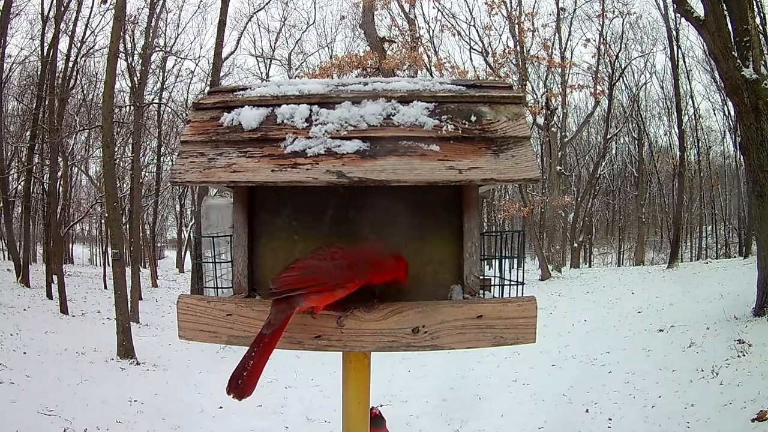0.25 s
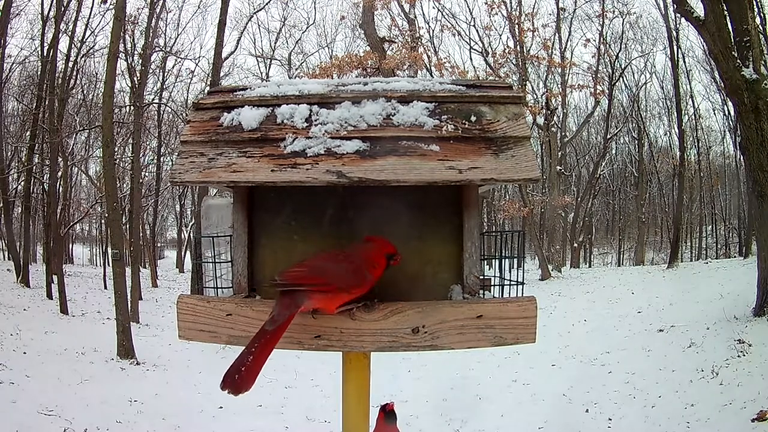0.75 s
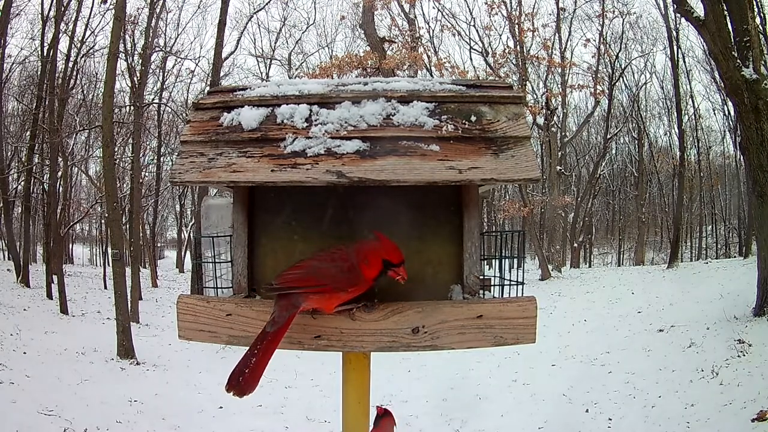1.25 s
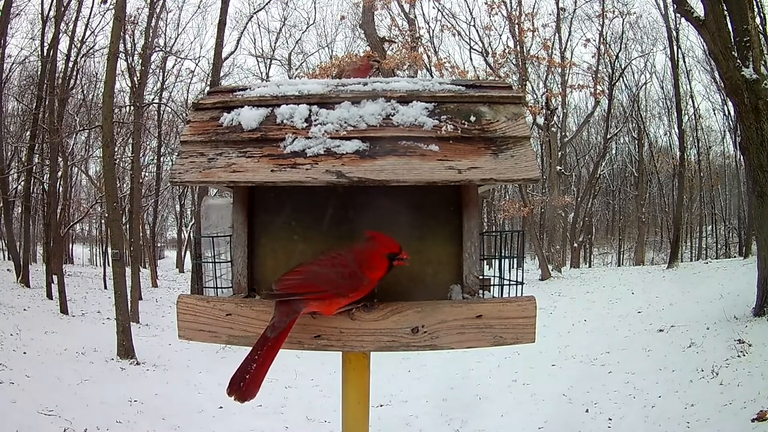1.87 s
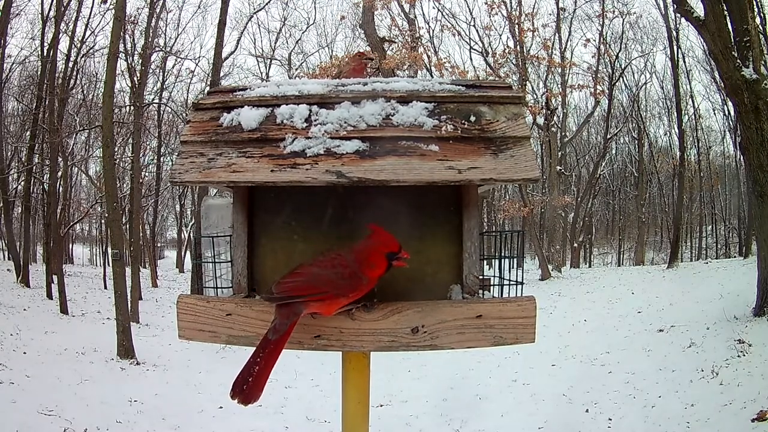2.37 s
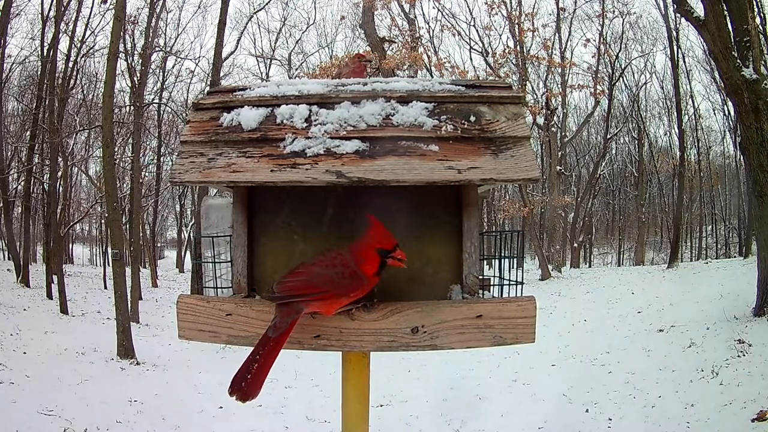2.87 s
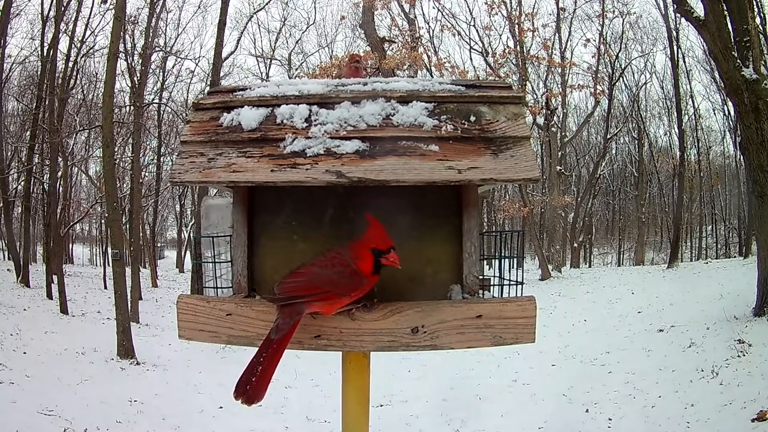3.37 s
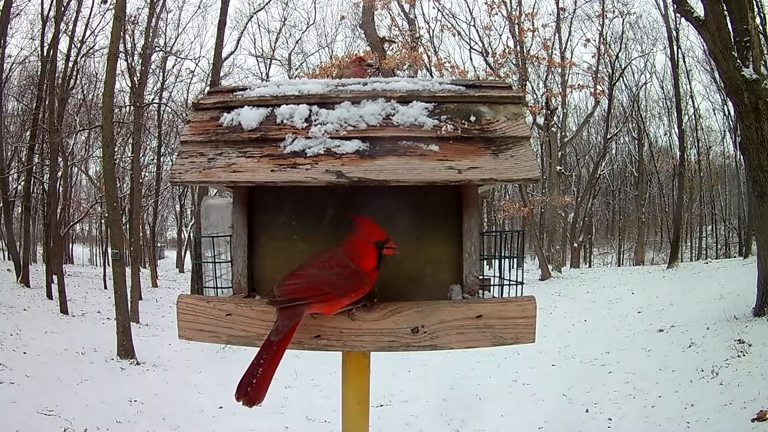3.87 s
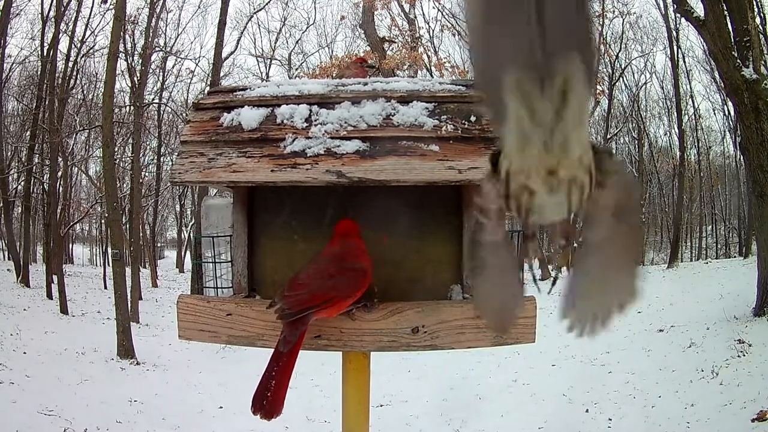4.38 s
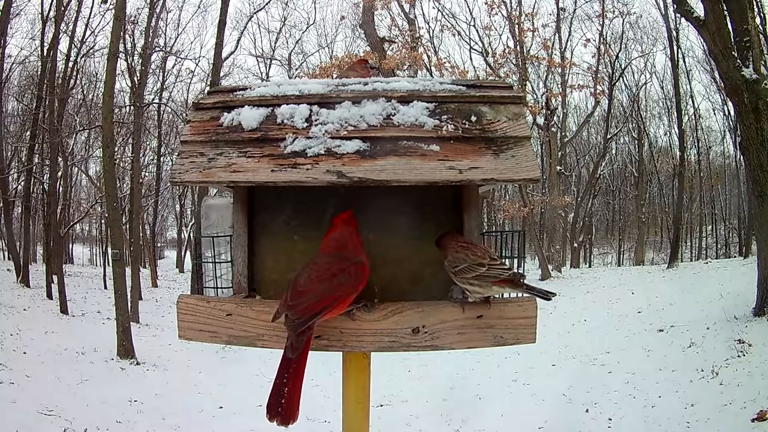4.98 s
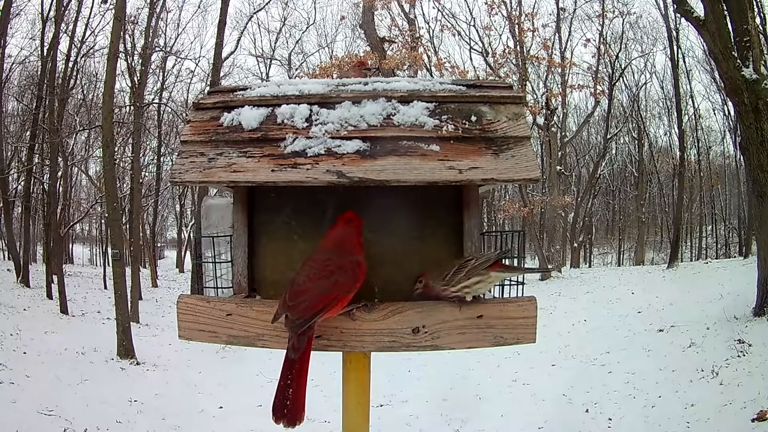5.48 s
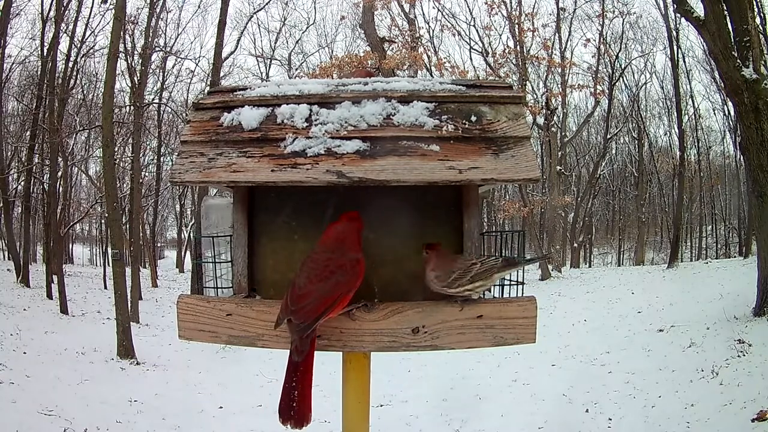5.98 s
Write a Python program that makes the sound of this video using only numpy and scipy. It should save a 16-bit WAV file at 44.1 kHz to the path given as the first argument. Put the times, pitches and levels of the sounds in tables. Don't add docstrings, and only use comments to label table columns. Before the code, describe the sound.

Very close on a wooden bird feeder in a quiet snowy wood, a fast cluster of sharp bill knocks and dry seed rummaging opens, thinning to single taps. Near silence follows with faint hiss, low trembling and tiny husk cracks. One small knock comes midway, then a short clatter of claws and a soft hollow thump.

```python
import sys
import numpy as np
from scipy import signal
from scipy.io import wavfile
from scipy.ndimage import uniform_filter1d

SR = 44100
rng = np.random.default_rng(int(sys.argv[2]) if len(sys.argv) > 2 else 0)


def rack_gain(trim_db):
    fader = np.asarray(trim_db, float)
    return 10 ** (fader / 20)


def log_audio(samples):
    frames = np.atleast_2d(samples).T
    limited = np.clip(frames, -1, 1)
    pcm = np.round(limited * 32767).astype(np.int16)
    wavfile.write(sys.argv[1], SR, pcm)


N = 275180


def rms_one(x):
    return x / np.sqrt(np.mean(x ** 2) + 1e-20)


def along(rows):
    time_s, level_db = np.transpose(rows)
    return rack_gain(np.interp(np.arange(N) / SR, time_s, level_db))


def bandpass(x, order, low_hz, high_hz):
    return signal.sosfilt(signal.butter(order, [low_hz, high_hz], "band", fs=SR, output="sos"), x)


def ring(force, modes, sign=-1):
    out = 0
    for k, (hz, db, t60) in enumerate(modes):
        radius = rack_gain(-60 / (t60 * SR))
        w = 2 * np.pi * hz / SR
        poles = [1, -2 * radius * np.cos(w), radius * radius]
        out = out + sign ** k * rack_gain(db) * signal.lfilter([0, np.sin(w)], poles, force + 1e-18)
    return out


# start_s, place, then peaks board_db, middle_db, bright_db
HARD_KNOCKS = [(0.0191, "rim", -13.5, -26, -15), (0.0276, "corner", -19, -48.5, -38),
               (0.0825, "floor", -26, -54.5, -25.5), (0.1316, "post", -24.5, -54.5, -40),
               (0.171, "floor", -11.5, -26, -8), (0.1772, "floor", -33, -40, -17),
               (0.1899, "rim", -14.5, -9, -16), (0.222, "corner", -25.5, -27, -25.5),
               (0.229, "corner", -14, -27, -15.5), (0.5705, "rim", -31.5, -39, -38.5),
               (0.658, "rim", -13.5, -19, -24), (3.3339, "corner", -14.5, -23, -19.5),
               (4.0351, "edge", -26, -38, -32), (4.0714, "post", -12, -16.5, -14),
               (4.2762, "edge", -17, -34.5, -26), (4.299, "perch", -21, -19.5, -17)]
TRAY_PLACES = {"rim": (1390, 2210, 3880, 5100.5, -30), "floor": (1150, 2230, 4030.5, 4900, -29.5),
               "corner": (1439.5, 2490, 3600, 5090, -27), "post": (1410, 2214.5, 3559, 5199.5, -27.5),
               "perch": (1646, 1967, 3679.5, 5199, -13.5), "edge": (1171, 1910, 3399, 5099.5, -41.5)}
# start_s, pitch_hz (board), then peaks board_db, bright_db
LIGHT_TICKS = [(0.046, 1450, -46, -27), (0.2807, 1069, -40, -48.5), (0.29, 877.3, -44.5, -50.5),
               (0.2986, 1222, -53.5, -54), (0.318, 1450, -40.5, -46.5), (0.3234, 1384, -44, -44.5),
               (0.4154, 1535, -30.5, -42), (0.423, 1495, -35.5, -54.5), (0.4641, 1228, -50, -45),
               (0.4701, 1248, -39.5, -47.5), (0.63, 1527, -45.5, -39), (1.3102, 1420, -57, -69.5),
               (2.1248, 1904, -46.5, -69.5), (2.2407, 1371, -49, -61), (2.874, 902.1, -51.5, -73),
               (2.8876, 1040, -47, -62.5), (2.9194, 1360, -53.5, -65.5), (3.2669, 902, -63.5, -55.5),
               (3.3028, 1225, -52.5, -44.5), (3.3055, 1171, -34.5, -48), (4.125, 1259, -52, -67),
               (4.157, 1259, -49.5, -67.5), (4.1655, 1087, -41, -58.5), (4.1895, 1450, -44, -56),
               (4.239, 1334, -40.5, -47.5), (4.2463, 1248, -54.5, -59), (4.2609, 1070, -40.5, -51.5),
               (4.3162, 1440, -30.5, -43), (5.6801, 1603, -58, -81.5)]
# start_s, pitch_hz (snap), then peaks board_db, bright_db, snap_db
HUSK_CRACKS = [
    (1.6694, 5130, -44.5, -40, -50.5),
    (2.4971, 4100, -69.5, -58.5, -64),
    (2.5743, 7031, -75.5, -59, -60.5),
    (2.5756, 10230, -74.5, -68.5, -64.5),
    (4.0599, 4910, -53.5, -24.5, -40.5),
    (4.2201, 6340, -55, -51, -62),
]
BOARD_HZ, MIDDLE_HZ, BRIGHT_HZ, TOP_HZ = 1390, 2239.9, 3784.2, 5050


def tap_rows():
    middle_under_board_db, top_under_bright_db = -12.5, -21
    rows = []
    for s, place, low, mid, high in HARD_KNOCKS:
        *rings_hz, top_db = TRAY_PLACES[place]
        rows.append((s, 0, *rings_hz, low, mid, high, high + top_db))
    for s, hz, low, high in LIGHT_TICKS:
        rows.append((s, 1, hz, MIDDLE_HZ, BRIGHT_HZ, TOP_HZ,
                     low, low + middle_under_board_db, high, high + top_under_bright_db))
    for s, hz, low, high, snap in HUSK_CRACKS:
        rows.append((s, 1, BOARD_HZ, MIDDLE_HZ, BRIGHT_HZ, hz,
                     low, low + middle_under_board_db, high, snap))
    return rows


def taps(rise_s=.0016, board_t60=0.0082, middle_t60=0.013, bright_t60=0.009, top_t60=.009):
    husk_hz = 6400
    spread = np.array([.08, 0.12, .03])
    light_ring_share = 0.77
    snap_db, snap_t60 = -12, .005
    rows = tap_rows()
    t = np.arange(2000) / SR
    out = np.zeros(N + len(t))
    chance = rng.random((len(rows), 6))
    snaps = rms_one(bandpass(rng.standard_normal((len(rows), len(t))), 7, 488.3, 3959))
    swell = np.sin(np.pi / 2 * np.minimum(t / rise_s, 1)) ** 2
    for row, c, snap in zip(rows, chance, snaps):
        s, light, hz, mid_hz, high_hz, top_hz, low_db, mid_db, high_db, top_db = row
        shift = 1 + light * (2 * c[3:] - 1) * spread
        mid_hz, high_hz, top_hz = shift * [mid_hz, high_hz, top_hz]
        tones = [(hz, low_db + .5, board_t60),
                 (hz * .72, low_db - 9.5, board_t60),
                 (mid_hz, mid_db + .5, middle_t60),
                 (high_hz, high_db - 2.0, bright_t60),
                 (2 * BRIGHT_HZ - high_hz + 250, high_db - 12.0, bright_t60),
                 (top_hz, top_db + 1.5, top_t60),
                 (husk_hz * (.92 + .1 * c[0]), top_db - 11.0, top_t60),
                 (husk_hz * (1.05 + 0.17 * c[1]), top_db - 13, top_t60),
                 (husk_hz * (1.45 + .25 * c[2]), top_db - 20.5, top_t60)]
        after = np.maximum(t - rise_s, 0) / light_ring_share ** light
        body = sum(rack_gain(d - 60 * after / t60) * np.sin(2 * np.pi * f * t) for f, d, t60 in tones)
        body = body + rack_gain((low_db + high_db) / 2 + snap_db - 60 * after / snap_t60) * snap
        i = round((s + 0.00066 - rise_s) * SR)
        out[i:i + len(t)] += swell * body
    return out[:N]


# start_s, length_s, board_db, shell_db
SCRAPE_BURSTS = [(0, 0.016, -44, -51), (0.02, 0.022, -36, -40.5), (0.046, 0.03113, -39, -44.5),
                 (0.074, 0.026853, -39.5, -49.5), (0.102, 0.02194, -53, -59.5), (0.129, 0.023413, -35.5, -41),
                 (0.153, 0.005906, -40.5, -49), (0.166, 0.027633, -29.5, -36), (0.195, 0.00236, -25.5, -35.5),
                 (0.201, 0.02257, -34.5, -40), (0.232, 0.024303, -52, -56), (0.263, 0.012447, -39.5, -49),
                 (0.375, 0.01562, -61.5, -63), (0.388, 0.010794, -37.5, -45.5), (0.414, 0.012987, -47, -72.5),
                 (0.438, 0.014732, -39.5, -47.5), (0.461, 0.031, -55.5, -65.5), (0.478, 0.0305, -41, -50.5),
                 (0.516, 0.010849, -40, -53), (0.527, 0.034075, -44.5, -56), (0.566, 0.007497, -40, -55.5),
                 (0.586, 0.00649, -42, -57), (0.6, 0.0153, -57, -64), (0.619, 0.049126, -45, -52),
                 (1.72, 0.05, -68, -84), (3.279, 0.00646, -55, -66), (3.287, .004, -53.5, -64),
                (3.298, 0.014204, -49, -58.5), (3.318, 0.015, -48.5, -45.5), (3.349, 0.02196, -62.5, -76.5),
                (4.004, 0.031, -66, -70.5), (4.036, 0.04741, -44.5, -47), (4.091, 0.018296, -58.5, -66.5),
                (4.122, 0.01467, -62, -78), (4.152, 0.0089, -51, -67), (4.166, 0.0096, -54.5, -71),
                (4.216, 0.016, -54, -69), (4.239, 0.035928, -48, -63.5), (4.274, 0.017995, -42.5, -41.5),
                (4.297, 0.025164, -44, -46.5)]
# pitch_hz, level_db, t60_s
BOARD_MODES = [(501, -4, 0.0037), (780, -3.5, .015), (1120, -4, 0.016), (1450, 1, .012), (1950, -6, 0.018),
               (2250, -3.5, 0.0095), (2800, -17, .008)]
SHELL_MODES = [(3320.9, -1, .012), (3850, 0, 0.013), (4200, -1.5, .012), (4925, -10.5, .008)]
HUSK_MODES = [(5200, 1, .008), (5900, -13, .008), (6600, -5, 0.016), (7300, -16, .008),
              (8571.7, -15.5, 0.018), (10900, -19, 0.0044), (14000, -31.5, .003)]


def scrapes(per_s=4000.0, spread_db=3.0, fade_s=.003, clump_db=4.0):
    rattle_s, rattle_db, rattle_shell_db = .016, -31.5, -7.5
    husk_under_shell_db = -16.5
    t = np.arange(N) / SR
    force = np.zeros((3, N))
    rattles = []
    for s, _, db, *_ in HARD_KNOCKS:
        rattles.append((s, rattle_s, db + rattle_db, db + rattle_db + rattle_shell_db))
    for s, length, board_db, shell_db in SCRAPE_BURSTS + rattles:
        levels_db = np.array([board_db, shell_db, shell_db + husk_under_shell_db])
        near = slice(round(max(s, 0) * SR), round((s + length + fade_s) * SR))
        onset = np.clip((t[near] - s) / .0015, 0, 1)
        shape = onset * np.clip(1 - (t[near] - s - length) / fade_s, 0, 1)
        force[:, near] += rack_gain(levels_db)[:, None] * shape

    grains = rack_gain(spread_db * np.minimum(rng.exponential(1, N), 3.5))
    grains = grains * rng.choice([-1, 1], N) * (rng.random(N) < per_s / SR)
    clumps = rms_one(uniform_filter1d(rng.standard_normal(N), size=130))
    grains = grains * rack_gain(clump_db * np.tanh(clumps))

    def rung(strength, modes):
        return ring(strength * grains, modes) / np.std(ring(grains, modes))

    wood = rung(force[0], BOARD_MODES) + rung(force[1], SHELL_MODES)
    wood_lowpass = signal.butter(4, 5215.6, fs=SR, output="sos")
    return signal.sosfilt(wood_lowpass, wood) + rung(force[2], HUSK_MODES)


# start_s, contact_s, pole_db, box_db
HOP_PUSHES = [(0.028, 0.0008764, -28.5, -25), (0.05, 0.002594, -42.5, -33), (0.101, 0.00588, -43, -50.5),
              (0.135, 0.002776, -46, -52.5), (.29, 0.002346, -44.5, -68.5), (0.343, 0.00308, -56.5, -69),
              (0.391, 0.00096, -52, -57.5), (0.442, 0.003913, -59, -72.5), (0.5, .002, -53, -45.5),
              (0.559, 0.002, -47.5, -59.5), (0.612, 0.0027, -50.5, -53), (3.285, 0.0026, -61.5, -49),
              (3.307, 0.00354, -45, -63.5), (4.037, 0.0045, -45.5, -52.5), (4.089, 0.002038, -49, -39),
              (4.25, .003, -50, -52.5), (4.291, 0.009008, -29.5, -42.5), (4.299, 0.0014496, -80, -19),
              (4.303, 0.002139, -27, -65), (4.308, 0.0025783, -68, -27)]
# pitch_hz, level_db, t60_s
POLE_MODES = [(78, -5, .45), (92.6, -1, .58), (106, -14, .55), (117.7, 0, .45), (130.4, -10, .5)]
BOX_MODES = [(207, -17, 0.18), (270, -10.5, .03), (348, -14, 0.24), (383, 0.5, .08), (520, -4.5, .03),
             (804.8, -7, 0.011)]
SWAY_MODES = [(126, -3.5, 0.13), (50, -0.5, 0.033), (171, -12, 0.043), (29.95, -6, 0.18)]


def thumps():
    lead_s, contact_s, knock_pole_db, knock_box_db = 0.0011, .0012, -28, -16
    pole, box = np.zeros(N), np.zeros(N)
    struck = []
    for s, _, db, *_ in HARD_KNOCKS:
        struck.append((s - lead_s, contact_s, db + knock_pole_db, db + knock_box_db))
    for s, contact, pole_db, box_db in HOP_PUSHES + struck:
        push = np.hanning(round(max(contact, .0002) * SR))
        push = push / push.sum()
        i = round(max(s, 0) * SR)
        pole[i:i + len(push)] += rack_gain(pole_db) * push
        box[i:i + len(push)] += rack_gain(box_db) * push
    return ring(pole, POLE_MODES, sign=1.0) + ring(pole, SWAY_MODES) + ring(box, BOX_MODES)


def thin_lines(hz, db, length):
    t = np.arange(round(length * SR)) / SR
    phase = 2 * np.pi * rng.random(len(hz))
    tones = np.sin(2 * np.pi * np.outer(hz, t) + phase[:, None])
    return np.hanning(len(t)) * (rack_gain(db) @ tones)


# pitch_hz, level_db (under the knock)
HALO_COLOUR = [(600, -51), (3000, -52.5), (4600, -46.5), (5500, -50), (7500, -55.5), (8100, -64),
               (11000, -61.5), (15700, -70.5)]


def halo(length=0.051, count=48):
    out = np.zeros(N + SR)
    knots, under_db = np.transpose(HALO_COLOUR)
    for s, *rings in tap_rows():
        loudest_db = max(rings[5:])
        hz = rng.uniform(knots[0], knots[-1], count)
        db = loudest_db + np.interp(hz, knots, under_db) + rng.normal(0, 4.0, count)
        swell = thin_lines(hz, db, length)
        i = round((s + .5 - length / 2) * SR)
        out[i:i + len(swell)] += swell
    return out[SR // 2:SR // 2 + N]


# time_s, level_db
TREMBLE_LEVEL = [(0.85, -66), (1.19, -68.5), (1.49, -63.5), (1.79, -67.5), (1.89, -52), (1.99, -67.5),
                 (2.11, -54), (2.27, -64), (2.43, -55), (2.6, -68.5), (2.69, -60.5), (3.12, -65.5),
                 (3.25, -56), (3.99, -68.5), (4.05, -50), (4.74, -67), (5.2, -73), (6.24, -71.5)]


def tremble():
    modes = [(78.57, 0.5, .2), (87.4, 2.0, .2), (121.75, -5, .12), (58.03, -6, .1), (139, -12.0, .06)]
    hum = ring(rng.standard_normal(N), modes)
    return rack_gain(1.5) * along(TREMBLE_LEVEL) * rms_one(hum)


# time_s, level_db
WIND_LEVEL = [(0.0, -33.5), (0.08, -46.5), (0.24, -62), (1.2, -62), (2.24, -64.5), (3.0, -72.5), (4.0, -69),
              (4.52, -60), (4.71, -64.5), (6.24, -73.5)]


def wind(low_hz=30, high_hz=58, drift_db=-68.5):
    lumps = bandpass(rng.standard_normal(N), 2, low_hz, high_hz)
    drift = bandpass(rng.standard_normal(N), 2, 12, 22)
    return rack_gain(-1.5) * along(WIND_LEVEL) * rms_one(lumps) + rack_gain(drift_db) * rms_one(drift)


# pitch_hz, level_db (per Hz)
AIR_COLOUR = [(88, -36.5), (150, -1.5), (190, -2), (300, -4.5), (470, -9.5), (915, -15.5), (1450, -13.5),
              (1800, -20.5), (3000, -27.5), (4500, -29.5), (4950, -26), (5500, -32), (8000, -32),
              (15700, -42)]


def air(patch_db=2.5, kept=0.18, thin_from_hz=2500, thin_full_hz=8000, lost_db=-11.5):
    hz, s, cells = signal.stft(rng.standard_normal(N), SR, nperseg=2048)
    knots, knots_db = np.transpose(AIR_COLOUR)
    colour = np.interp(np.log(hz + 1), np.log(knots), knots_db)
    treble = np.clip((hz - thin_from_hz) / (thin_full_hz - thin_from_hz), 0, 1)[:, None]
    blotch = np.repeat(rng.standard_normal((13, len(s))), 80, axis=0)[:len(hz)]
    patches = 0.28 * rng.standard_normal(len(s)) + 0.35 * blotch
    lost = rng.random(cells.shape) < treble * (1 - kept * rack_gain(3.0 * patches))
    gain = rack_gain(colour[:, None] + patch_db * np.sqrt(treble) * patches + lost_db * lost)
    hiss = signal.istft(cells * gain, SR, nperseg=2048)[1][:N]
    return rack_gain(-67) * rms_one(hiss)


def ducking(near, knee_db=-41.0, share=0.21, release_db_s=60.5):
    power = uniform_filter1d(near ** 2, size=441).clip(0)
    level = 10 * np.log10(power + 1e-12)
    ramp = release_db_s * np.arange(N) / SR
    cut = np.maximum.accumulate(share * np.maximum(level - knee_db, 0) + ramp) - ramp
    return rack_gain(-cut)


# start_s, level_db
LINE_BLIPS = [(.8, -90), (1.18, -90.5), (1.98, -93), (2.55, -90.5), (2.85, -91.5), (3.48, -95),
              (3.8, -93.5), (4.79, -92.5), (5.3, -95), (5.65, -93)]


def blips(count=12):
    out = np.zeros(N + SR)
    for s, db in LINE_BLIPS:
        swell = thin_lines(rng.uniform(10800, 12900, count), np.full(count, db), 0.04984)
        i = round((s + .5 - .018) * SR)
        out[i:i + len(swell)] += swell
    return out[SR // 2:SR // 2 + N]


def scene():
    near = taps() + scrapes() + thumps()
    background = tremble() + wind() + ducking(near) * air() + blips()
    return (near + halo() + background)[None]


def band_limit(x):
    return signal.sosfilt(signal.butter(12, 15810, fs=SR, output="sos"), x)


def record(dry):
    return band_limit(dry)


dry = scene()
out = record(dry)
log_audio(out)
```